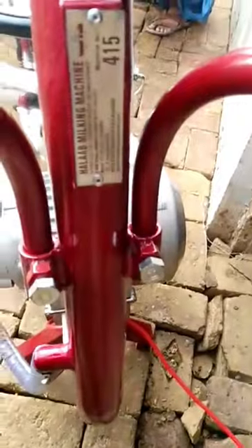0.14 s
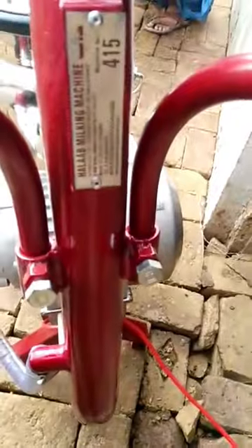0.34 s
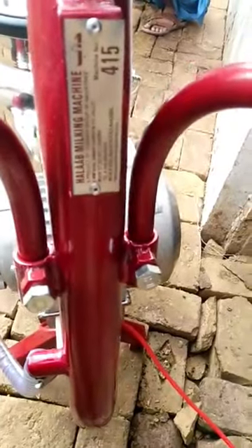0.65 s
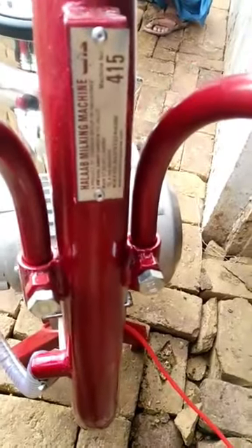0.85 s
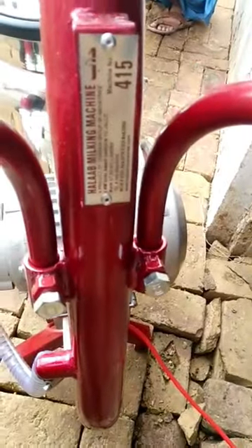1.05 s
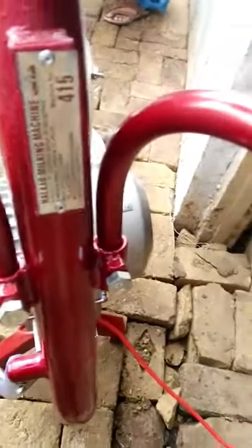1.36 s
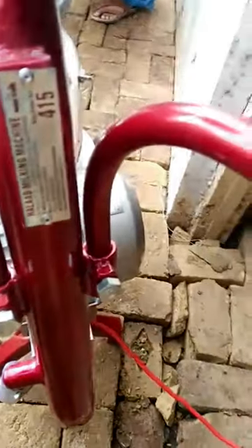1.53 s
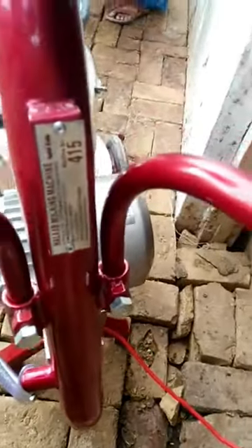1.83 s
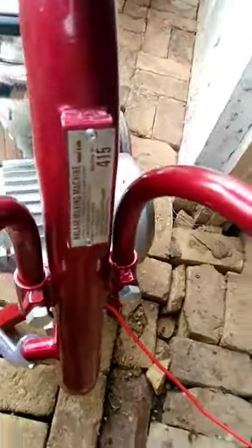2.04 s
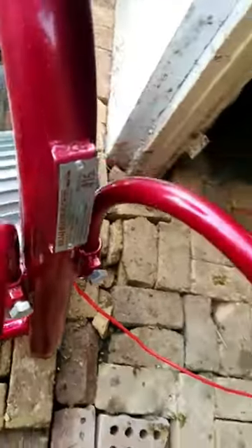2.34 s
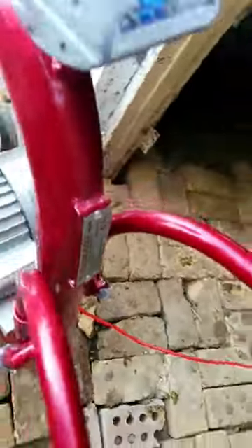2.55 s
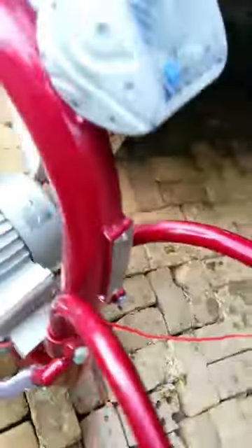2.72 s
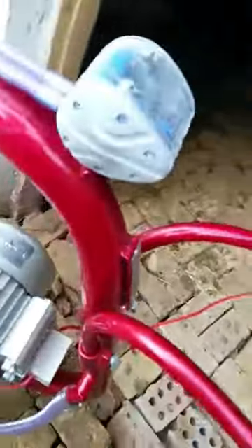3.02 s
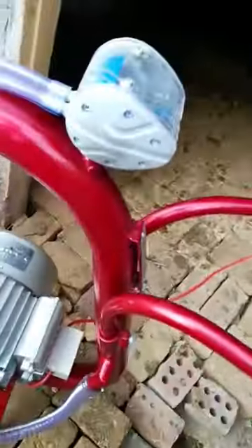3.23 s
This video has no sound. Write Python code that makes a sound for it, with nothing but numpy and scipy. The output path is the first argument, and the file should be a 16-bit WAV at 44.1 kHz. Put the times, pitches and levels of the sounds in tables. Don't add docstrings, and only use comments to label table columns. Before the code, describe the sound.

A motor-driven vacuum pump drones loudly and steadily while a pulsator clacks twice a second.

```python
import sys
import numpy as np
from scipy import signal
from scipy.fft import rfft, irfft
from scipy.io import wavfile
from scipy.ndimage import uniform_filter1d, map_coordinates

SR = 44100
rng = np.random.default_rng(int(sys.argv[2]) if len(sys.argv) > 2 else 0)


def dump_mix(stems):
    frames = np.atleast_2d(stems).T
    limited = np.clip(frames, -1, 1)
    pcm = np.round(limited * 32767).astype(np.int16)
    wavfile.write(sys.argv[1], SR, pcm)


def invert_db(x):
    u = np.asarray(x, float) / 20
    return 10 ** u


N = 149058

SHAFT_HZ, START_TURN = 24.453, .84

# t/s, turned away/0-1, nearness level/dB
PHONE_POSE = [
    (0, 0.08, 0),
    (.8, 0, 0),
    (1.4, 0.16, 0.5),
    (1.8, 0.37, -0.3),
    (2.2, 0.37, -0.3),
    (2.75, .62, -0.66),
    (2.95, .85, .2),
    (3.38, 1, 1),
]
# t/s, cup level/dB, cup f/Hz, cap level/dB, cap f/Hz
STROKES = [
    (.1007, -18, 2080, -21, 4860),
    (.5352, -19, 2060, -25, 3570),
    (.9592, -19, 2050, -21, 4880),
    (1.3942, -18.5, 2050, -24, 3560),
    (1.8214, -18, 2040, -22, 4850),
    (2.2543, -20, 2160, -21, 3950),
    (2.6783, -17, 2040, -11.5, 3930),
    (3.1148, -15, 2090, -18, 3850),
]
SLAM_HZ = [2450, 2800, 3150, 3500, 3800, 4200, 4600, 5100, 5500]
# f/Hz, level/dB per Hz
AIR_SPECTRUM = [(15, -63), (25, -19), (189, -16), (241, -22), (392, -7.5), (1040, -14.5), (5670, -3.5),
                (12400, -12.5), (15800, -27)]
# multiple of shaft rate, level/dB facing, level/dB side on, level/dB away
SLOT_WHINE = [(48, -58, -50, -41), (179, -44, -39.5, -43), (226, -40, -46, -52), (228, -40, -41, -48),
              (230, -35, -43, -50), (285, -44, -47, -46)]
# f/Hz, level/dB per Hz
CLATTER_SPECTRUM = [(410, -34), (700, -16.5), (1190, -9.5), (2720, 1.5), (3390, -4.5), (4340, 0.5),
                    (5640, -0.5), (12300, -15.5), (15800, -15.5)]
# f/Hz, width/Hz
HOUSING_MODES = [(1565, 220), (2060, 120), (2370, 130), (2735, 100), (4000, 200), (4365, 190), (5545, 90),
                 (5630, 80), (6310, 50), (6975, 120), (9570, 240), (5200, 250)]
# level/dB facing, level/dB side on, level/dB away
HOUSING_DB = [(-37, -40, -38.5), (-46, -41.5, -41), (-45, -43.5, -32), (-46, -46, -38), (-64, -48, -35.5),
              (-41, -34, -36), (-30.5, -37, -52), (-28.5, -35.5, -57), (-44, -46, -46), (-34, -38.5, -35),
              (-41, -49, -36), (-38, -46, -57)]
# multiple of vane rate, level/dB
THUMP_SPECTRUM = [(1, -9), (2, 4.5), (3, -20.5), (4, 7.5), (5, 3.5), (6, -5.5), (7, -27.5), (8, -4.5),
                  (9, -4.5), (10, -14.5), (11, -26), (12, -6.5), (13, -9), (14, -2), (15, -10.5), (16, 2.5),
                  (17, 3), (18, -2), (19, 0), (20, -17), (21, -2), (22, -8), (23, -6), (24, -5.5)]
VANE_DB = [2.5, 2, -16, -6.5]
DROPOUT_HZ = [12300, 13100, 13900, 14600, 15200, 15700]
DROPOUT_SHARE = [.04, .08, .1, .22, .3]


def rms(x, db):
    return x * invert_db(db) / np.sqrt(np.mean(x ** 2))


def colour(x, table):
    hz = np.maximum(np.arange(4097) * SR / 8192, 1)
    point_hz, point_db = np.array(table, float).T
    log_gain = np.interp(np.log(hz), np.log(point_hz), point_db) * np.log(10) / 20
    ceps = irfft(log_gain)
    ceps[1:4096] *= 2
    ceps[4097:] = 0
    return signal.fftconvolve(x, irfft(np.exp(rfft(ceps))))[:N]


def band(x, hz, width_hz):
    return signal.lfilter(*signal.iirpeak(hz, hz / width_hz, fs=SR), x)


def mode(x, hz, width_hz):
    return band(band(x, hz, width_hz), hz, 2 * width_hz)


def walk(rate_hz):
    k = int(SR / rate_hz)
    steps = np.repeat(rng.standard_normal(N // k + 1), k)
    return 1.3 * uniform_filter1d(uniform_filter1d(steps, k), k)[:N]


def spikes(times_s, sizes):
    out = np.zeros(N + 4000)
    at = np.asarray(times_s)[:, None] * SR
    i = np.floor(at).astype(int) + np.arange(-7, 9)
    kernel = np.sinc(i - at) * np.cos((i - at) * np.pi / 16) ** 2
    np.add.at(out, np.maximum(i, 0), np.asarray(sizes)[:, None] * kernel)
    return out[:N]


def by_angle(away, levels_db):
    return np.interp(away, [0, .5, 1], levels_db)


def swaying_tone(hz, age_s, sway_rad, rate_hz):
    return np.sin(2 * np.pi * hz * age_s + sway_rad * walk(rate_hz))


def pulsator(t):
    slam_db, far_side_db, fade_db_per_s, slam_decay_s = -15.5, -2, -1.1, .0055
    rise_s, chatter_s, fall_s = .001, .011, .003
    wobble_db, cap_sag_db_per_s = 2.5, 250
    out = 0
    for k, (stroke_s, cup_db, cup_hz, cap_db, cap_hz) in enumerate(STROKES):
        age = t - stroke_s
        elapsed = age.clip(0)
        crack = 0
        for hz in SLAM_HZ:
            detune, phase = rng.random(2)
            crack = crack + np.sin(2 * np.pi * (hz * (1 + .04 * detune) * age + phase))
        rise = np.clip(age / rise_s, 0, 1)
        level_db = slam_db + far_side_db * (k % 2) + fade_db_per_s * stroke_s
        slam = invert_db(level_db) * rise * np.exp(-elapsed / slam_decay_s) * crack
        chatter = rise * np.exp(-np.clip(age - chatter_s, 0, 1) / fall_s)
        cup = invert_db(cup_db + wobble_db * walk(400)) * swaying_tone(cup_hz, age, .5, 300)
        cap_level_db = cap_db - cap_sag_db_per_s * elapsed + wobble_db * walk(500)
        cap = invert_db(cap_level_db) * swaying_tone(cap_hz, age, 1.0, 400)
        out = out + slam + chatter * (cup + cap)
    return out


def air_hiss(air):
    return rms(colour(air, AIR_SPECTRUM), -22.5) * invert_db(.8 * walk(9))


def winding_hum(t, air, grit):
    hum_db, hum_hz, lag_s = -39, 296.5, .0026
    tone = invert_db(hum_db) * np.sqrt(2) * np.sin(2 * np.pi * hum_hz * (t - lag_s))
    return tone + rms(mode(air + grit, 317, 28), -43.5)


def slot_whine(turns, away):
    out = 0
    for multiple, *levels_db in SLOT_WHINE:
        level = invert_db(by_angle(away, levels_db) + 2.9 * walk(11.86))
        out = out + level * np.sqrt(2) * np.sin(2 * np.pi * multiple * turns + 0.81 * walk(8.9))
    return out


def scrape(turns):
    turn_samples, memory, grit_db = 3608, .8, 3.0
    roughness = np.repeat(rng.standard_normal((100, turn_samples // 44)), 44, axis=1)
    fresh = rng.standard_normal((100, turn_samples)) * invert_db(grit_db * roughness)
    kept = signal.lfilter([1], [1, -memory], fresh, axis=0)[15:].ravel()
    kept = signal.sosfilt(signal.butter(8, .4, output="sos"), kept)
    return rms(map_coordinates(kept, [turns * turn_samples], order=3, mode="mirror"), 0)


def housing_rings(grit, air, away):
    drive = grit + .6 * air
    out = 0
    for (hz, width_hz), levels_db in zip(HOUSING_MODES, HOUSING_DB):
        level = invert_db(by_angle(away, levels_db) + 1.0 * walk(8.8))
        out = out + rms(mode(drive, hz, width_hz), 0) * level
    return out


def clatter(grit):
    return rms(colour(grit, [(150, -42)] + list(CLATTER_SPECTRUM)), -24.5)


def thumps(t):
    jitter_s, scatter_db = .00003, 1.0
    load_db, load_peak_s, stroke_s, load_walk_db = 3, .18, .4306, 1.2
    chance = rng.standard_normal((330, 2))
    k = np.arange(len(chance))
    times_s = (k / 4 + START_TURN - 1) / SHAFT_HZ + jitter_s * chance[:, 0]
    harmonics = [(m * 4 * SHAFT_HZ, db) for m, db in THUMP_SPECTRUM]
    spectrum = [(30, -49)] + harmonics + [(3200, -10.5), (6000, -40)]
    drone = colour(spikes(times_s, -invert_db(.5 * chance[:, 1])), spectrum)
    train = spikes(times_s, -invert_db(np.array(VANE_DB)[k % 4] + scatter_db * chance[:, 1]))
    swell_db = load_db * np.cos(2 * np.pi * (t - load_peak_s) / stroke_s)
    load = invert_db(swell_db + load_walk_db * walk(8))
    knock = mode(train * load, 475, 470)
    return rms(drone, -30.5) + rms(knock, -34.5)


def pump(t, away):
    throb_db, throb_turn = 2.8, .42
    third_cut, bite_gain, notch_depth = .35, 0.58, .85
    turns = t * SHAFT_HZ
    grit, air = scrape(turns), rng.standard_normal(N)
    throb = invert_db(throb_db * np.cos(2 * np.pi * (turns - START_TURN - throb_turn)))

    beat = thumps(t)
    third = band(beat, 12 * SHAFT_HZ, 22)
    bite = band(beat, 1380, 510)
    beat = beat - third_cut * third + bite_gain * away * bite

    broad = clatter(grit) + air_hiss(air)
    hiss = housing_rings(grit, air, away) * throb + broad * throb ** .3
    hiss = hiss - notch_depth * (1 - .5 * away) * band(hiss, 3450, 330)
    return beat + hiss + slot_whine(turns, away) * throb + winding_hum(t, air, grit)


def scene():
    t = np.arange(N) / SR
    pose_s, pose_away, pose_db = np.array(PHONE_POSE, float).T
    away = np.interp(t, pose_s, pose_away)
    nearness = invert_db(np.interp(t, pose_s, pose_db))
    return (pump(t, away) * nearness + pulsator(t))[None]


def treble_dropouts(x):
    k = int(.035 * SR)
    spec, hz = rfft(x), np.arange(N // 2 + 1) * SR / N
    for lo, hi, share in zip(DROPOUT_HZ, DROPOUT_HZ[1:], DROPOUT_SHARE):
        gone = np.repeat(rng.random(N // k + 1) < share, k)[:N] * .9
        treble = irfft(spec * ((hz >= lo) & (hz < hi)), N)
        x = x - uniform_filter1d(gone, size=400) * treble
    return x


def roll_off(x):
    return signal.sosfilt(signal.butter(12, 16000, fs=SR, output="sos"), x)


def record(dry):
    open_s, fade_s = 0.081, 0.017
    gate = np.clip((np.arange(N) / SR - open_s) / fade_s, 0, 1) ** 2
    dry = signal.sosfilt(signal.butter(2, 45, "high", fs=SR, output="sos"), dry)
    dry = signal.sosfilt(signal.ellip(10, .5, 60, 15720, fs=SR, output="sos"), dry)
    limited = np.tanh(1.201 * dry) / 1.199
    return roll_off(treble_dropouts(limited) * gate)


dry = scene()
out = record(dry)
dump_mix(out)
```